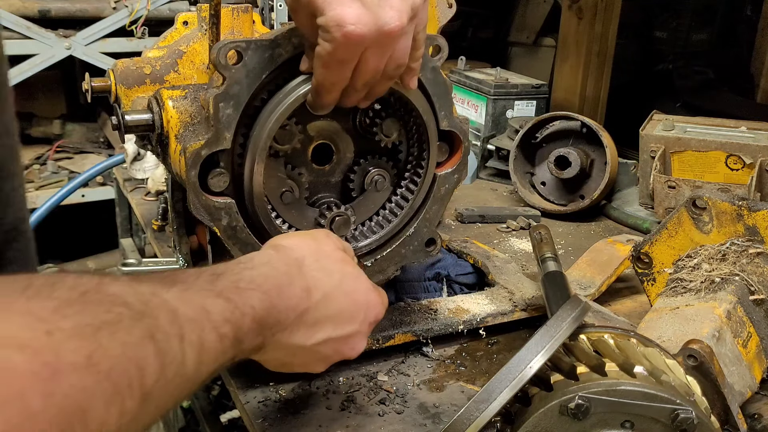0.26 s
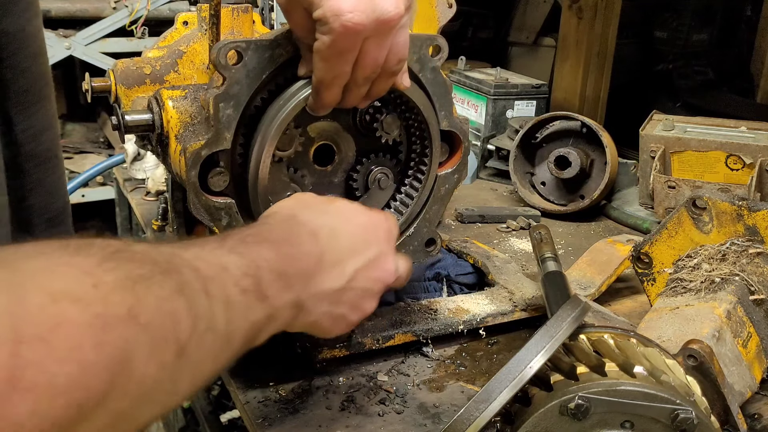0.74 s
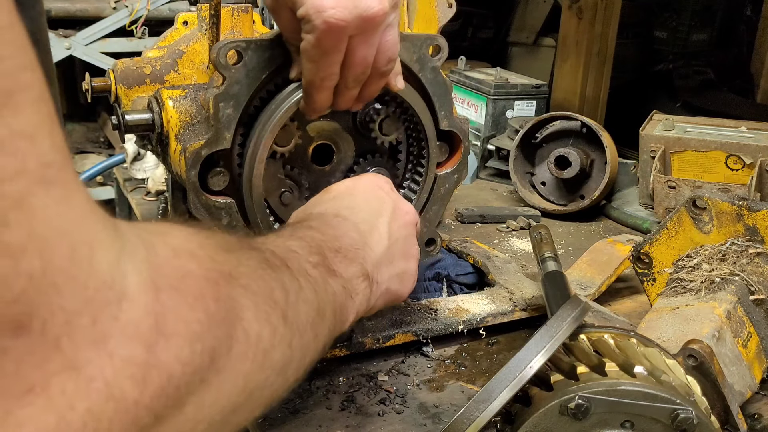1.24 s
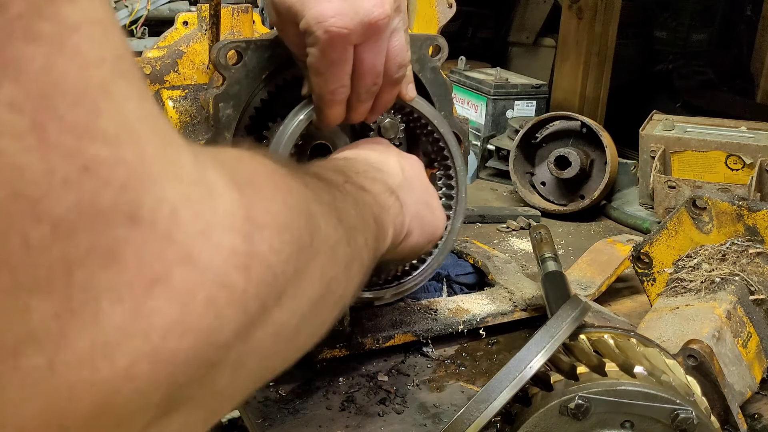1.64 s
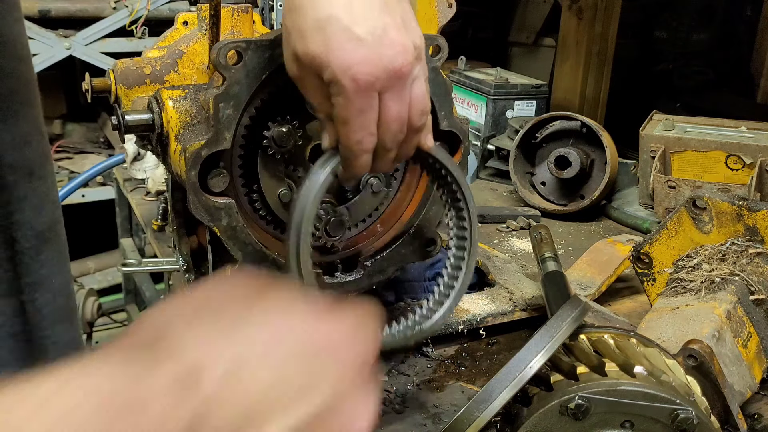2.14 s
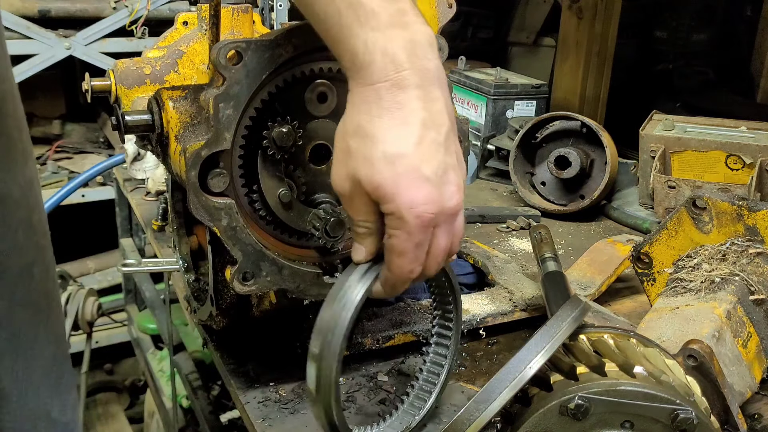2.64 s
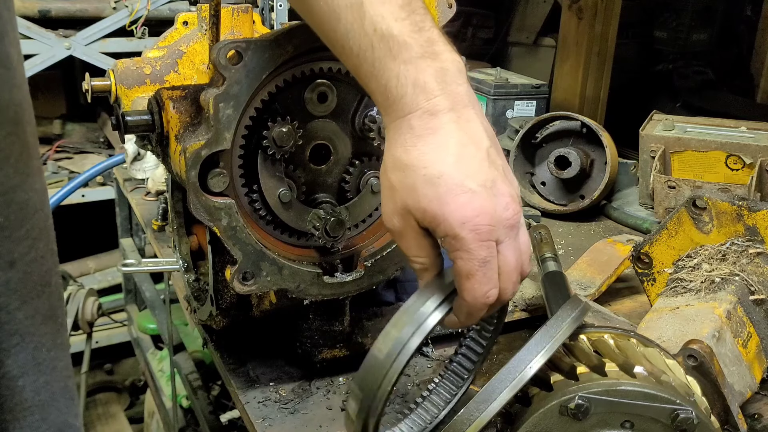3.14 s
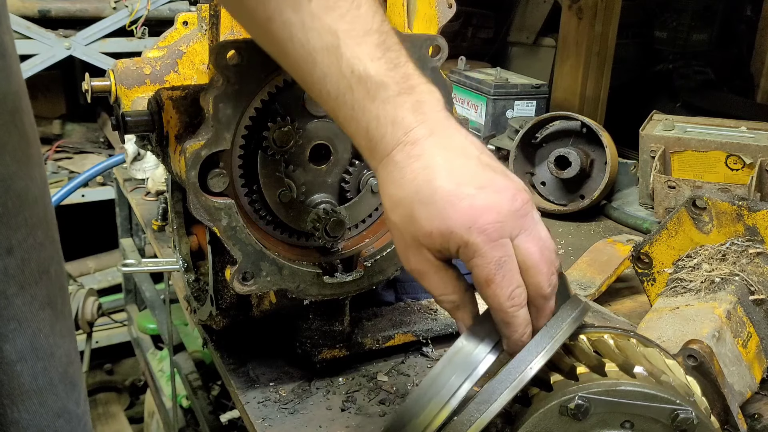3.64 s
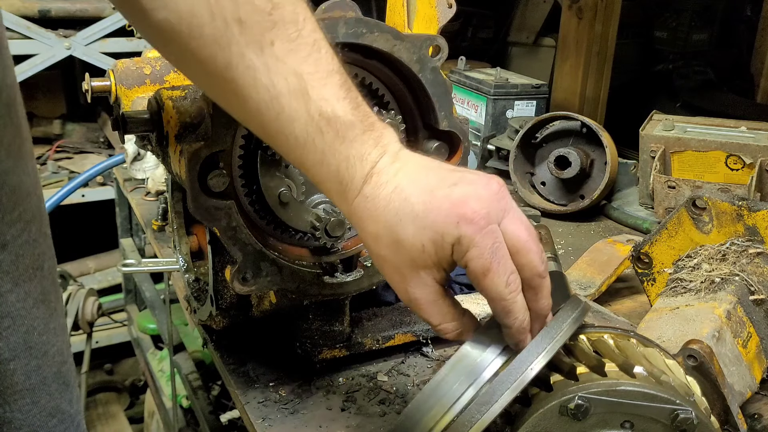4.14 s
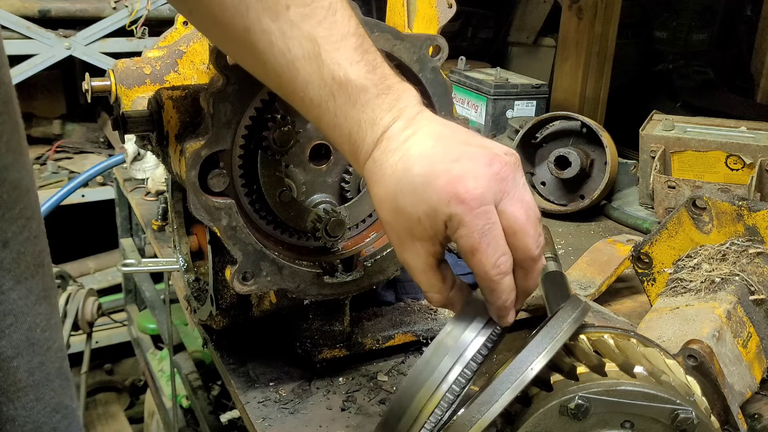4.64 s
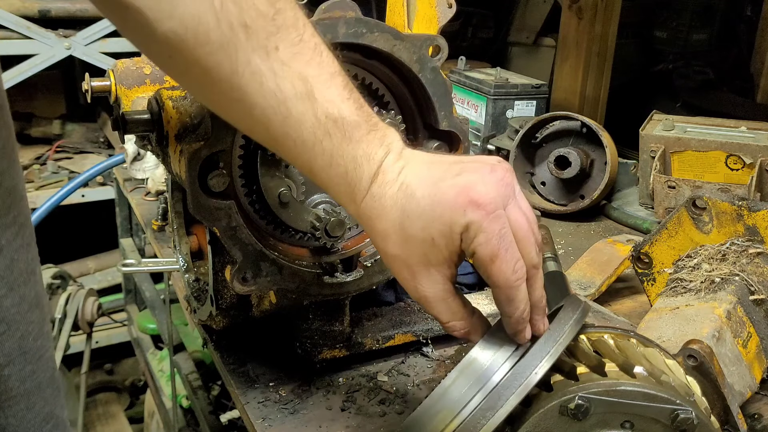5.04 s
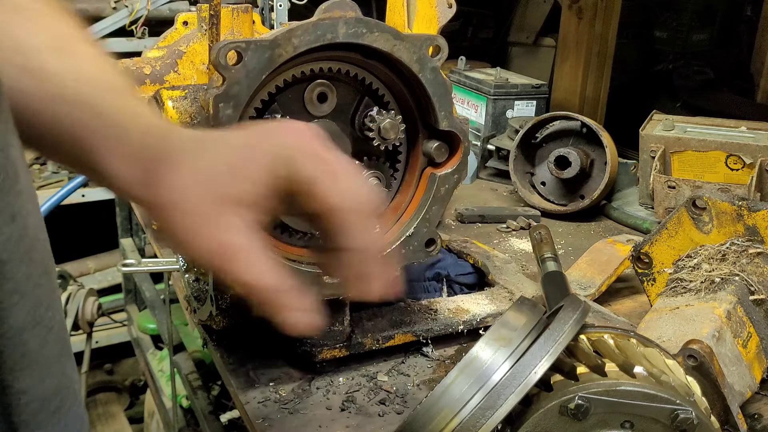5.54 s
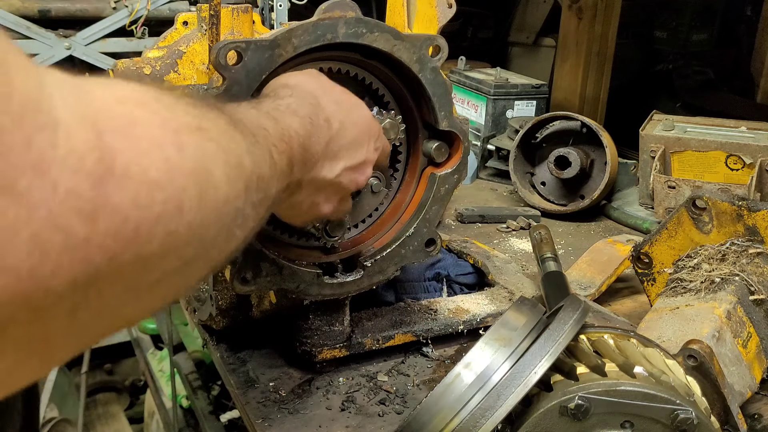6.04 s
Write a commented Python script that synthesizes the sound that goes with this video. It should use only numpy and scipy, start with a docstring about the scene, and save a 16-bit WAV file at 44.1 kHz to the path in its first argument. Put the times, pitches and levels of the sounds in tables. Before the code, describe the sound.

Small steel clinks and a sharp tooth catch, a heavy ring thuds on a workbench, then clanks and scrapes against a big gear wheel.

```python
"""In a small workshop with a low hum, a steel ring gear is worked out of its cast housing,
stood on a workbench and leaned against a big crown wheel; a sleeve brushes past.
Blows are impulse responses: damped modes over dense chatter, low-passed by the softness of the contact.
Grinding and sliding are trains of random stick-slip taps filtered by the same kind of response.
Band-shaped noise makes the air, the cloth and the diffuse echo; wavering sines make the hum."""
import sys
import numpy as np
from scipy import signal
from scipy.fft import rfft, irfft, next_fast_len
from scipy.io import wavfile
from scipy.ndimage import uniform_filter1d

SR = 44100
rng = np.random.default_rng(int(sys.argv[2]) if len(sys.argv) > 2 else 0)


def store_pcm(level_fs):
    """Save levels as 16-bit WAV."""
    pcm = np.round(np.clip(level_fs, -1, 1) * 32767).astype(np.int16)
    wavfile.write(sys.argv[1], SR, np.atleast_2d(pcm).T)


N = 277389  # samples in the scene

# Third-octave centre frequencies in Hz, and the signs of left and right.
BANDS = 31.25 * 2 ** (np.arange(28) / 3)
SIDES = np.array([[1], [-1]])
# The crowd of short-lived modes in small steel parts.
# Each row: frequency in Hz, relative level in dB per Hz.
STEEL = [(200, -17.5), (400, -15), (700, -23), (1250, -7), (2500, -4), (3800, -2), (5000, -6), (6500, 4.5),
         (8000, -15), (9500, -9.5), (15000, -11)]
STEEL_SPLIT = .012  # how far contact splits a mode, as a share of its frequency
STEEL_PUSH_S = .001  # how long a steel contact pushes


def undb(db):
    """Amplitude gain is ten to the power of the level in decibels over twenty."""
    return 10 ** (np.asarray(db) / 20)


def at(table, hz):
    """Spectra are read along a logarithmic frequency axis, in straight lines between the rows."""
    f, value = np.transpose(table)
    return np.interp(np.log(hz), np.log(f), value)


def unit(x):
    """Energy is the sum of squares; a stereo signal is scaled to a mean of one per channel."""
    return x / np.sqrt(np.sum(x ** 2) / 2)


def spread(hz, corner_hz=900):
    """Two microphones lose coherence as wavelength shrinks: 0.12 in the bass, near 1 in the treble."""
    return np.hypot(.12, hz ** 2 / (hz ** 2 + corner_hz ** 2))


def fade(t, t60):
    """Exponential decay falls by 60 dB in the time t60."""
    return np.exp(-np.log(1000) * t / max(t60, .002))


def noise_bands(size):
    """Overlapping third-octave windows split stereo noise into bands of unit energy."""
    octaves = np.log2(np.maximum(np.fft.rfftfreq(size, 1 / SR), 1))
    mid, side = rfft(rng.standard_normal((2, size)))
    for hz in BANDS:
        window = np.sqrt(np.maximum(1 - 3 * np.abs(octaves - np.log2(hz)), 0))
        stereo = mid + spread(hz) * SIDES * side
        yield hz, unit(irfft(window * stereo, size))


def hiss(colour):
    """Shaping the spectrum of white noise gives a steady stereo hiss, here of rms 1."""
    size = next_fast_len(N)
    hz = np.maximum(np.fft.rfftfreq(size, 1 / SR), 1)
    mid, side = rfft(rng.standard_normal((2, size)))
    gain = undb(at(colour, hz)) * hz / (hz + 10)
    stereo = mid + spread(hz) * SIDES * side
    return unit(irfft(gain * stereo, size)[:, :N]) * np.sqrt(N)


def walk(rate):
    """Averaging held random values gives a smooth drift, with about `rate` new values a second."""
    k = int(SR / rate)
    held = np.repeat(rng.standard_normal(N // k + 1), k)
    return uniform_filter1d(held, k)[:N]


def chatter(colour, t60, crack_db, crack_s=.008, size=8192):
    """High modal density sounds as decaying noise: a short crack over a quickly damped clatter."""
    t = np.arange(size) / SR
    out = 0
    for hz, band in noise_bands(size):
        few_cycles = 8 / hz  # low bands need longer to die
        envelope = fade(t, t60 + few_cycles) + undb(crack_db) * fade(t, crack_s + few_cycles)
        out = out + undb(at(colour, hz)) * np.sqrt(hz) * unit(band * envelope)
    return unit(out)


def ring(modes, size, split, count=4):
    """Contact splits each damped mode into beating neighbours, out of step between the microphones."""
    t = np.arange(size) / SR
    out = np.zeros((2, size))
    for k, (hz, db, t60) in enumerate(modes):
        life = t[:int(1.2 * t60 * SR) + 64]
        detune, phase = rng.standard_normal((2, count))
        beat_phase = 2 * np.pi * hz * split * detune[:, None] * life + np.pi * phase[:, None]
        neighbours = np.exp(1j * beat_phase).mean(axis=0)
        crowding = min(hz * split / 12, 2)
        carrier = np.exp(2j * np.pi * hz * life)
        stereo_phase = np.exp(1j * SIDES * spread(hz) * np.pi / 4)
        wave = np.imag((1 + crowding * neighbours) * carrier * stereo_phase)
        sign = (-1) ** k
        out[:, :len(life)] += sign * undb(db) * unit(wave * fade(life, t60))
    return unit(out)


def body(modes, colour, split, t60, ring_db, crack_db, size=26000):
    """An impulse response is the sum of a few clear modes and a dense chatter of unit energy."""
    answer = undb(ring_db) * ring(modes, size, split)
    dense = chatter(colour, t60, crack_db)
    answer[:, :dense.shape[1]] += dense
    return answer


def soften(x, hard_hz):
    """A soft contact acts as a low-pass filter: it cannot excite the treble."""
    low_pass = signal.butter(2, min(hard_hz, .45 * SR), fs=SR, output="sos")
    return signal.sosfilt(low_pass, x)


def strike(hits, modes, colour, split, push_s, crack_db, pan_db, size=26000):
    """Impact excites a body's impulse response; level counts the energy as spread over 10 ms.

    Each hit: start in seconds, level in dB, contact hardness in Hz, chatter t60 in seconds,
    ring over chatter in dB. pan_db is left minus right, one for all hits or one each."""
    out = np.zeros((2, N + size))
    push = np.sin(np.pi / 2 * np.minimum(np.arange(size) / SR / push_s, 1)) ** 2
    for (s, db, hard_hz, t60, ring_db), side_db in zip(hits, np.broadcast_to(pan_db, len(hits))):
        answer = push * body(modes, colour, split, t60, ring_db, crack_db)
        blow = unit(soften(answer, hard_hz)) * np.sqrt(SR / 100)
        start = max(int(s * SR), 0)
        out[:, start:start + size] += blow * undb(db + SIDES * side_db / 2)
    return out[:, :N]


def strokes(rows, attack_s, release_s):
    """Effort of a hand follows an envelope: it builds up linearly, holds and dies exponentially."""
    t = np.arange(N) / SR
    effort = 0
    for s, length, db in rows:
        build = np.clip((t - s) / attack_s, 0, 1)
        release = fade(np.maximum(t - s - length, 0), release_s)
        effort = effort + undb(db) * build * release
    return effort


def rub(effort, modes, colour, split, slips_per_s, uneven_db, hard_hz, low_hz, ring_db, count=3):
    """Stick-slip friction at a few contacts: dense uneven taps, too light to move the lowest modes."""
    high_pass = signal.butter(2, low_hz, "high", fs=SR, output="sos")
    out = 0
    for _ in range(count):
        happens = rng.random(N) < slips_per_s / count / SR
        slips = happens * undb(uneven_db * np.clip(rng.standard_normal(N), -2, 2))
        slips *= rng.choice([-1, 1], N) / np.sqrt(count * np.mean(slips ** 2))
        answer = soften(body(modes, colour, split, 0.03, ring_db, crack_db=-0.5), hard_hz)
        answer = unit(signal.sosfilt(high_pass, answer))
        out = out + signal.fftconvolve((slips * effort)[None], answer, axes=1)[:, :N]
    return out


def background(pan_db=-3.0):
    """Low-passed noise and modulated sines make a drone with a wavering hum, under a faint even hiss."""
    # The workshop air. Each row: frequency in Hz, relative level in dB per Hz.
    air_colour = [(15, -47.5), (25, -24.5), (53, -1), (75, 1.5), (96, -15), (129, 0), (193, -14), (240, -3),
                  (289, -11), (482, -24.5), (523, -33), (582, -29), (1020, -38.5), (1110, -44),
                  (15500, -48.5)]
    air_db = -63  # before the drone's swell
    # The hum. Each row: frequency in Hz, level in dB before the wavering and the drone's swell.
    hum_tones = [(68, -73.5), (128, -69.5)]
    # The drone slowly swells and sinks. Each row: time in seconds, gain in dB.
    drone = [(0, -0.5), (1.6, 3), (2.2, -1), (4.3, -1), (5.3, 1), (6.29, 2)]
    t = np.arange(N) / SR
    air = undb(air_db) * hiss(air_colour)
    low = signal.sosfiltfilt(signal.butter(2, 600, fs=SR, output="sos"), air)
    hum = 0
    for hz, db in hum_tones:
        level = undb(db + 4.9 * walk(7)) * np.sqrt(2)
        hum = hum + level * np.sin(2 * np.pi * hz * t + 0.69 * walk(6.6))
    swell = undb(np.interp(t, *np.transpose(drone)) + SIDES * pan_db / 2)
    return air - low + (low + hum) * swell


def workshop(x, build_s=.011, size=40000):
    """Diffuse reverberation from cluttered walls builds up briefly; each band decays at its own rate."""
    # The strength of the echo. Each row: frequency in Hz, level in dB.
    echo_level = [(60, -13), (250, -16), (600, -14.5), (1500, -17.5), (5000, -17), (7500, -24), (9500, -21),
                  (15000, -19)]
    # The decay of the echo. Each row: frequency in Hz, t60 in seconds.
    echo_t60 = [(100, .55), (400, 0.72), (1200, .72), (5000, 0.28), (8000, 0.6), (14000, .42)]
    t = np.arange(size) / SR
    onset = 1 - np.exp(-(t / build_s) ** 2)
    tail = 0
    for hz, band in noise_bands(size):
        share = hz * np.log(2) / 3 / (SR / 2)  # the band's part of the whole spectrum
        decaying = unit(band * onset * fade(t, at(echo_t60, hz)))
        tail = tail + undb(at(echo_level, hz)) * np.sqrt(share) * decaying
    return signal.fftconvolve(x, tail, axes=1)[:, :N]


def sleeve(flutter_db=4.0):
    """Friction noise of cloth follows the speed of the arm, a bell curve for each move."""
    # An arm brushes past. Each row: middle in seconds, width in seconds, level in dB.
    moves = [(3.515, 0.026, -75), (3.778, 0.029, -73.5), (4.10, .08, -84), (5.77, 0.21, -77.5),
             (6.17, .15, -85)]
    # The colour of the cloth. Each row: frequency in Hz, relative level in dB per Hz.
    cloth = [(1000, -10), (4000, -9), (7000, 2), (9000, -5), (15000, -2.5)]
    t = np.arange(N) / SR
    speed = sum(undb(db) * np.exp(-((t - s) / width) ** 2) for s, width, db in moves)
    return hiss(cloth) * speed * undb(flutter_db * walk(30))


def small_part():
    """Free vibration after impact: a small steel part touches down lightly, then drops and rings."""
    # Each row: start in seconds, level in dB, contact hardness in Hz, chatter t60 in seconds,
    # ring over chatter in dB.
    part_hits = [(0.017, -48, 9057, .06, -13), (0.1275, -20, 14000, 0.038, 8.5)]
    # Modes of the part. Each row: frequency in Hz, relative level in dB, t60 in seconds.
    part_modes = [(2748, -13.5, 0.077), (4470, -8.5, 0.057), (5000, 4.5, 0.073), (4510, -24.5, 0.32),
                  (2770, -30, 1), (6230, -5.5, 0.043), (7300, -6.5, .05), (7970, -13.5, 0.046)]
    return strike(part_hits, part_modes, STEEL, STEEL_SPLIT, push_s=0.0019, crack_db=-6.0, pan_db=-4.0)


def housing():
    """Heavy damping: the casting answers each knock of the ring with the same modes, short and dull."""
    # Each row: start in seconds, level in dB, contact hardness in Hz.
    housing_hits = [ (0.077, -37.5, 1980), (0.1218, -39, 4470), (0.7629, -38.5, 2800), (0.778, -46, 3200),
                    (0.805, -46, 1950), (1.284, -40.5, 1500), (1.3115, -35, 3220), (1.318, -33.5, 3480),
                    (1.338, -40, 3000), (1.360, -43, 393), (1.551, -50, 3000), (1.677, -63, 602),
                    (1.900, -70, 700), (2.020, -67.5, 700)]
    # Modes of the casting. Each row: frequency in Hz, relative level in dB, t60 in seconds.
    housing_modes = [(263.9, -1, 0.22), (385, 4, 0.046), (617, -2, 0.053), (880, -11.5, 0.11),
                     (1277.7, -1.5, 0.13), (1689, -5, .08)]
    # The dense modes beneath. Each row: frequency in Hz, relative level in dB per Hz.
    cast_colour = [(100, -6), (300, 0.5), (650, -6), (1000, -4.5), (1600, -2.5), (2800, -3), (4000, -18),
                   (12000, -36)]
    chatter_s, ring_db = 0.077, -7.5
    knocks = [(*hit, chatter_s, ring_db) for hit in housing_hits]
    return strike(knocks, housing_modes, cast_colour, STEEL_SPLIT, push_s=0.0022, crack_db=-3.0, pan_db=-1.5)


def bench():
    """Contact time sets the band excited: the bench thuds under the ring, sways under slow pushes."""
    # The ring lands, bounces and rocks. Each row: start in seconds, level in dB,
    # contact hardness in Hz, chatter t60 in seconds, ring over chatter in dB.
    bench_hits = [(2.6315, -10, 2530, 0.15, 8), (2.6455, -24, 1503, 0.061, -2),
                  (2.897, -44, 4000, 0.15, -10), (3.189, -45, 3003, 0.07, 6), (3.214, -48, 5020, 0.12, -15)]
    # Modes of the bench. Each row: frequency in Hz, relative level in dB, t60 in seconds.
    bench_modes = [(124, -7, 0.21), (213, 1.5, 0.075), (220, -9, 0.19), (250, -3, 0.15), (299, -1.5, 0.4),
                   (342, -1.5, 0.1), (423.5, 3.5, 0.12), (423, -25, .6), (581, -18, .12), (861, -17, 0.089),
                   (990, -19.5, 0.12), (1860, -27, 0.16)]
    # The dense modes beneath. Each row: frequency in Hz, relative level in dB per Hz.
    bench_colour = [(50, -18.5), (110, -13), (220, 0.5), (380, 0.5), (500, -8.5), (650, -19.5), (950, -10),
                    (1300, -14), (1800, -20.5), (2800, -35.5), (6000, -37.5), (14000, -35.5)]
    # The loaded bench is pushed. Each row: start in seconds, level in dB.
    sway_hits = [(1.398, -51), (1.53, -47), (3.775, -45.5), (4.069, -56.5)]
    # Modes of the sway. Each row: frequency in Hz, relative level in dB, t60 in seconds.
    sway_modes = [(64.8, 7.5, 0.46), (72.4, -10, 0.44)]
    split = .002  # share of a mode's frequency
    hard_hz, chatter_s, ring_db = 135, 0.3, 18  # of the pushes
    pushes = [(*hit, hard_hz, chatter_s, ring_db) for hit in sway_hits]
    thuds = strike(bench_hits, bench_modes, bench_colour, split, push_s=0.0015, crack_db=-14, pan_db=-1.1)
    sway = strike(pushes, sway_modes, bench_colour, split, push_s=.015, crack_db=-30, pan_db=-4.5)
    return thuds + sway


def crown_wheel():
    """Impact and friction on one body: the ring clanks on the wheel, slides over it, ticks on its rim."""
    # The ring meets the wheel. Each row: start in seconds, level in dB, contact hardness in Hz,
    # chatter t60 in seconds, ring over chatter in dB.
    wheel_hits = [ (3.545, -66, 803, 0.046, -7), (3.590, -57, 1805, 0.093, -3),
                  (3.668, -54, 1292, 0.046, -2), (3.896, -63, 4000, 0.095, -1),
                  (4.5732, -27, 10800, 0.2, 3), (4.575, -26, 2480, 0.015, -6), (4.8428, -32, 9700, 0.12, 4),
                  (4.862, -34, 2500, 0.11, -20), (4.893, -40, 456, 0.12, -26),
                  (4.917, -38.5, 4050, 0.07, -10)]
    # Modes of the wheel. Each row: frequency in Hz, relative level in dB, t60 in seconds.
    wheel_modes = [(257.7, -1.5, 0.26), (314.5, 0.5, 0.11), (414, -6.5, 0.11), (857, -7, 0.15),
                   (896, -5.5, .1), (979, 0.5, 0.099), (1034, -19, 0.71), (1039, -1.5, 0.094),
                   (1200, -8, 0.25), (1255, -6, 0.22), (1310, -4, 0.11), (1553, -14, 0.14),
                   (2310, -6.5, 0.15), (2370, -9, 0.027), (2540, -14.5, 0.2), (2670, -20.5, 0.16),
                   (3060, -24.5, 0.12), (3460, -22.5, 0.15), (3862, -25.5, 0.22), (4530, -21.5, 0.15),
                   (4720, -18, 0.18), (4950, -24, 0.1), (6380, -22.5, 0.12), (7070, -21, .1),
                   (8700, -39, .08), (9950, -36.5, 0.15)]
    # The dense modes beneath. Each row: frequency in Hz, relative level in dB per Hz.
    wheel_colour = [(100, -10.5), (290, 4.5), (400, -3), (520, -18.5), (660, -19.5), (850, -8), (1050, 6.5),
                    (1300, -13.5), (1900, -26), (2400, -26), (3000, -43.5), (4700, -27.5), (5700, -40.5),
                    (7000, -35), (14000, -56.5)]
    # The rim ticks lightly. Each row: start in seconds, level in dB.
    rim_hits = [(3.896, -71.5), (4.975, -79), (5.054, -61), (5.087, -72), (5.103, -75)]
    # Modes of the rim. Each row: frequency in Hz, relative level in dB, t60 in seconds.
    rim_modes = [(4515, 4.5, 0.11), (4800, -2, 0.08), (7050, 6, 0.12), (10200, -4, .06)]
    # Each push slides the ring's face. Each row: start in seconds, length in seconds, level in dB.
    slides = [(3.365, .045, -76), (3.586, 0.089, -54), (3.748, 0.03, -65), (3.888, 0.086, -67),
              (4.208, 0.043, -71.5), (4.833, 0.056, -45.5)]
    # Modes of the gripped, sliding ring. Each row: frequency in Hz, relative level in dB, t60 in seconds.
    slide_modes = [(395, 5, 0.0294), (899.6, -2, 0.11), (1005, -1.5, 0.15), (1245, -11.5, 0.045),
                   (1640, -20.5, 0.18), (2480, -22, 0.16), (4540, -15, .1)]
    wheel_split, rim_split = .009, .016  # shares of a mode's frequency
    hard_hz, chatter_s, ring_db = 8500, 0.027, 13  # of the ticks
    ticks = [(*hit, hard_hz, chatter_s, ring_db) for hit in rim_hits]
    push = strokes(slides, attack_s=0.01, release_s=.11)
    clanks = strike(wheel_hits, wheel_modes, wheel_colour, wheel_split, STEEL_PUSH_S, crack_db=-5, pan_db=-.9)
    rim = strike(ticks, rim_modes, STEEL, rim_split, push_s=0.002, crack_db=12, pan_db=-3.5)
    scrape = rub(push, slide_modes, wheel_colour, wheel_split, slips_per_s=1800, uneven_db=3.0,
                 hard_hz=2260, low_hz=250, ring_db=11.5)
    return clanks + rim + scrape


def teeth():
    """A harder catch is a shorter contact, so brighter; teeth also grind, and one edge snaps free."""
    # Teeth catch and slip in the housing. Each row: start in seconds, level in dB,
    # chatter t60 in seconds, left minus right in dB.
    tooth_hits = [ (0.03, -44, .017, -4.5), (0.038, -29, .017, -1.5), (0.095, -56, .07, -4.5),
                  (0.111, -49.5, .04, -3), (0.1225, -30, .045, 1), (0.245, -43, .027, 0),
                  (0.518, -65.5, .03, -7), (0.534, -54.5, .05, 2.5), (0.693, -57.5, .025, 0),
                  (0.701, -41, .01, -1.5), (0.7641, -46, .045, -0.5), (0.8371, -37, .012, -1),
                  (0.965, -70, .023, -5), (1.215, -54.5, .03, -4.5), (1.226, -39, .04, -5),
                  (1.233, -37.5, .04, -2), (1.2431, -17, .032, -.5), (1.259, -33.5, .05, 0.5),
                  (1.2639, -30, .018, 1), (1.2753, -29.5, .04, -1), (1.335, -46.5, .028, 5),
                  (1.374, -37.5, .045, -3.5), (1.551, -45, .03, -6), (1.5749, -48, .02, -5),
                  (1.706, -56, .025, -6.5), (2.360, -82, .025, 1), (5.826, -71.5, .03, 3)]
    # Modes of the teeth. Each row: frequency in Hz, relative level in dB, t60 in seconds.
    tooth_modes = [(1666, -16, 0.5), (2420, -10, 0.055), (3280, -11, .06), (4650, 3.5, .04),
                   (4950, 2, 0.044), (4740, -11, 0.36), (6080, 4, 0.025), (6720, -2.5, .04)]
    # One edge snaps free. Each row: start in seconds, level in dB, contact hardness in Hz,
    # chatter t60 in seconds, ring over chatter in dB.
    snap_hits = [(1.3568, -28, 15100, 0.016, 2.5)]
    # Modes of that edge. Each row: frequency in Hz, relative level in dB, t60 in seconds.
    snap_modes = [(7650, -2, .015), (8050, 0, .02), (13300, -12, .03)]
    # Each pull grinds the teeth. Each row: start in seconds, length in seconds, level in dB.
    grinds = [(1.224, 0.15, -42.5), (1.536, .016, -56), (1.587, 0.0094, -55), (1.748, 0.017, -67)]
    # Hardness of the lightest touch, and what a catch at firm_db adds; the addition doubles every 10 dB.
    touch_hz, firm_hz, firm_db, doubling_db = 4540, 4779, -28, 10
    ring_db = -6
    catches, places = [], []
    for s, db, t60, side_db in tooth_hits:
        hard_hz = touch_hz + firm_hz * 2 ** ((db - firm_db) / doubling_db)
        catches.append((s, db, hard_hz, t60, ring_db))
        places.append(side_db)
    pull = strokes(grinds, attack_s=.008, release_s=0.084)
    clinks = strike(catches, tooth_modes, STEEL, STEEL_SPLIT, STEEL_PUSH_S, crack_db=-1, pan_db=places)
    snap = strike(snap_hits, snap_modes, STEEL, STEEL_SPLIT, STEEL_PUSH_S, crack_db=6, pan_db=1)
    grind = rub(pull, tooth_modes, STEEL, STEEL_SPLIT, slips_per_s=780, uneven_db=5,
                hard_hz=5500, low_hz=700, ring_db=-8)
    return clinks + snap + grind


def scene():
    """Direct and reverberant sound add up; the crown wheel is nearest, so it is the driest."""
    far = small_part() + teeth() + housing() + bench()
    near = crown_wheel()
    echo = workshop(far + undb(-2.5) * near)
    return far + near + echo + sleeve() + background()


def record(dry):
    """Band limiting: a steep elliptic low-pass cuts the top above 15.8 kHz."""
    low_pass = signal.ellip(10, .2, 80, 15800, fs=SR, output="sos")
    return signal.sosfilt(low_pass, dry)


dry = scene()
out = record(dry)
store_pcm(out)
```